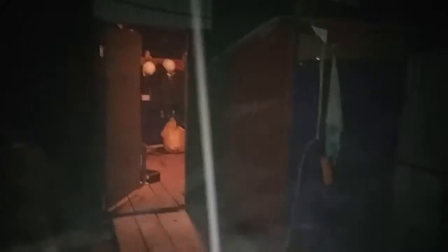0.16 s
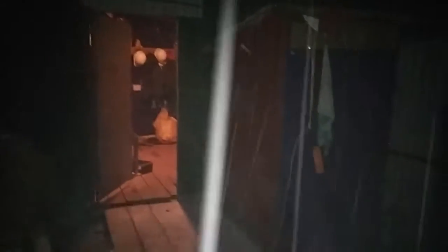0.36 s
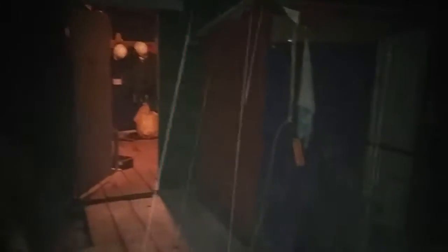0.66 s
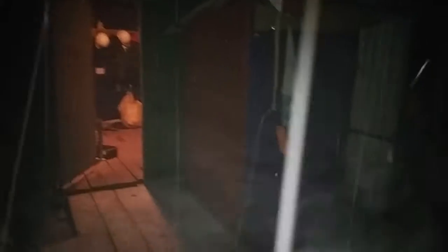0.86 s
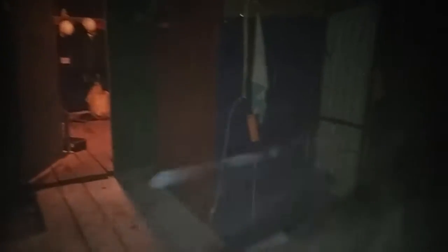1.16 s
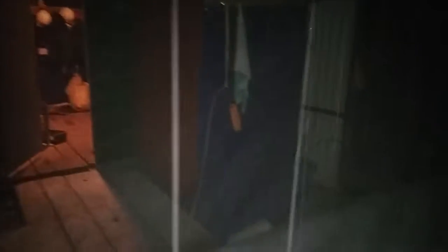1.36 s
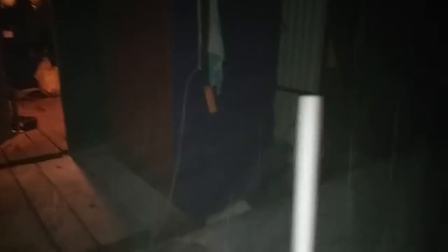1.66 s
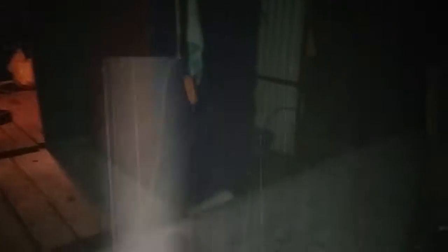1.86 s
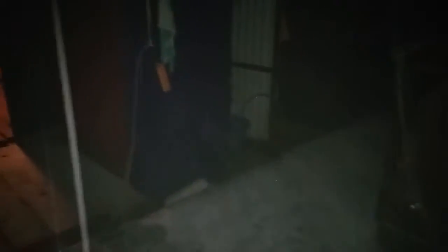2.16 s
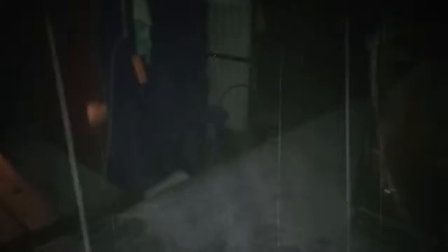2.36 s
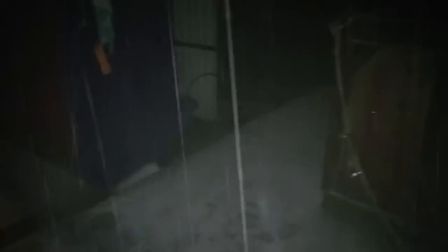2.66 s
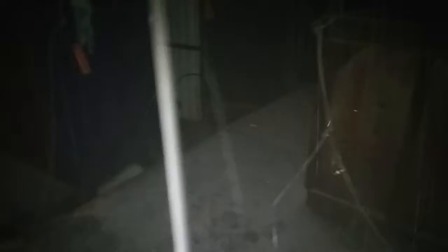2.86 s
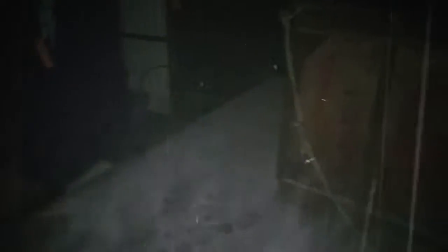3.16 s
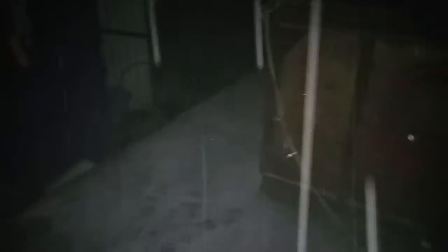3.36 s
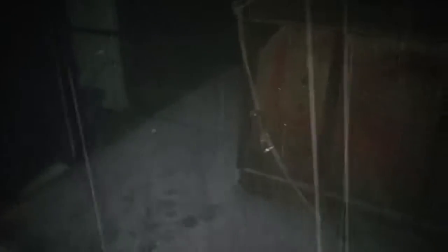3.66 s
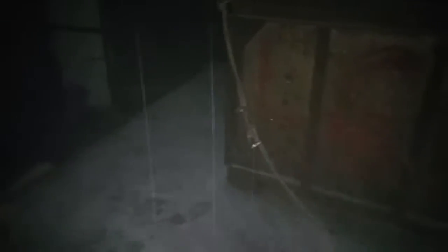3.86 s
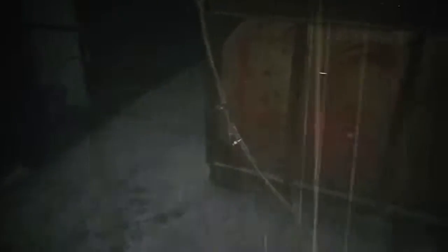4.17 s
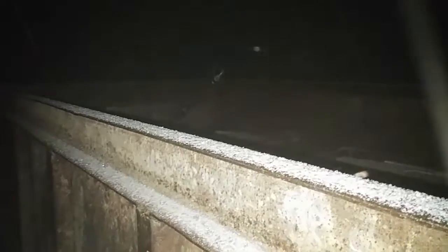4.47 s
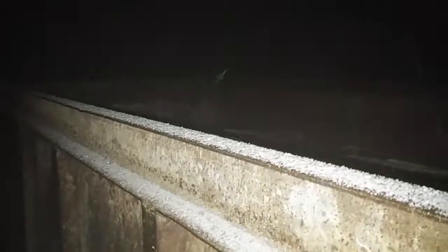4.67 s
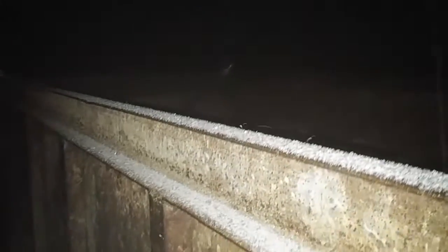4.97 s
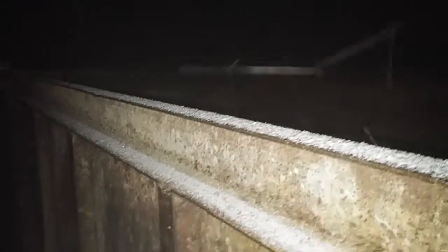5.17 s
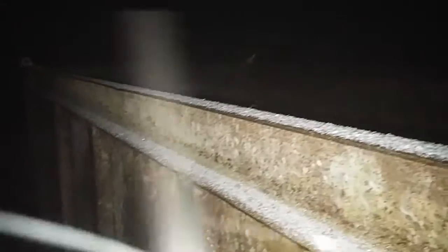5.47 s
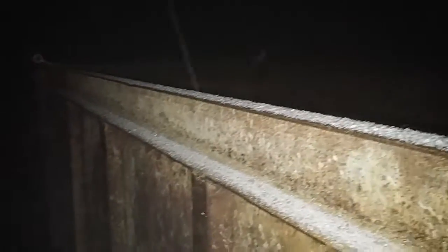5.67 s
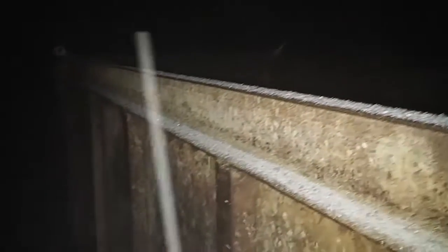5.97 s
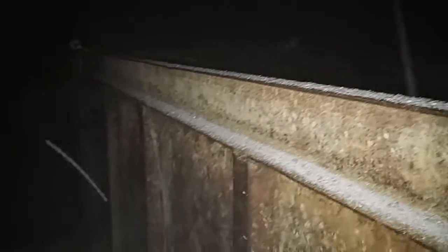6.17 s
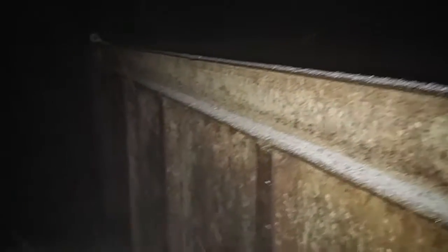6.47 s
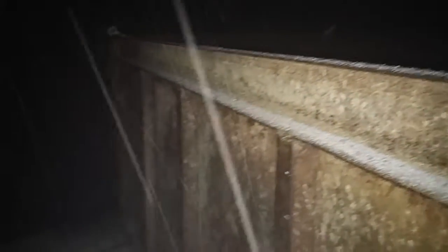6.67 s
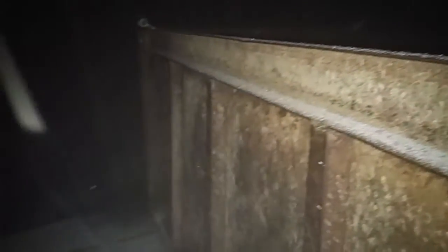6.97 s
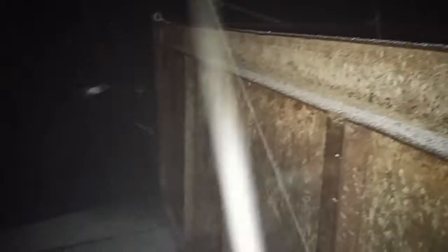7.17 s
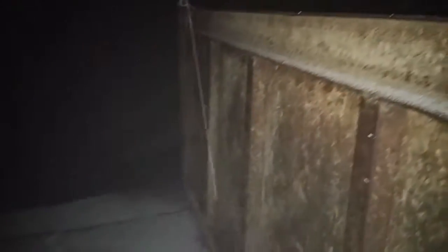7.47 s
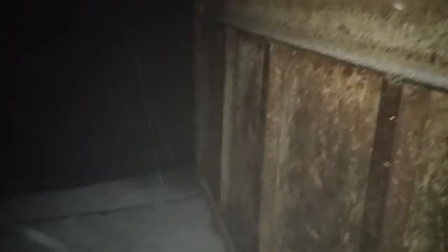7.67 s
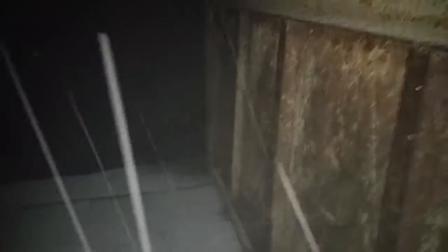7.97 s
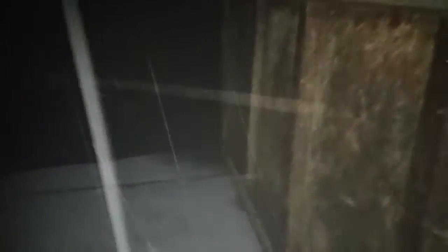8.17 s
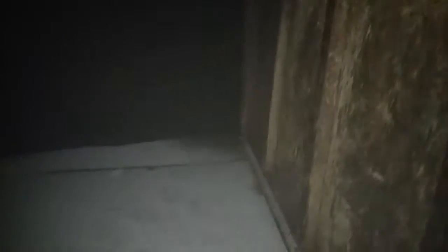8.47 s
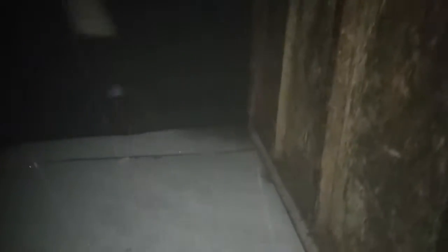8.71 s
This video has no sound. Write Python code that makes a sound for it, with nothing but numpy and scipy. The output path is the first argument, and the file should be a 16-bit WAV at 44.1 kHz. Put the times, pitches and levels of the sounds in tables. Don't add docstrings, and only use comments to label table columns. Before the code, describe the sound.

Sleet falls steadily outdoors at night. Countless distant pellets blend into a soft, grainy hiss, while nearer ones knock briefly on wooden walls, ledge, roof and deck. A hand-held stereo device picks up occasional hard, bright ticks on its own body, each letting the muffled treble open for a moment. Knocks crowd together around four seconds, then come in looser clusters to the end.

```python
import sys
import numpy as np
from scipy import signal
from scipy.fft import rfft, irfft
from scipy.io import wavfile

SR = 44100
rng = np.random.default_rng(int(sys.argv[2]) if len(sys.argv) > 2 else 0)


def output_pcm(signal):
    pcm = np.clip(np.atleast_2d(signal).T, -1, 1) * 32767
    wavfile.write(sys.argv[1], SR, np.round(pcm).astype(np.int16))


def volts_from_db(level):
    exponent = np.asarray(level, float) / 20
    return 10 ** exponent


N = 389844


def rms_one(x):
    return x / np.sqrt(np.mean(x ** 2) + 1e-20)


def in_time(rows):
    s, *columns = np.transpose(rows)
    return np.array([np.interp(np.arange(N) / SR, s, c) for c in columns])


def at_hz(hz_points, values, hz):
    return np.interp(np.log(np.maximum(hz, 1)), np.log(hz_points), values)


def band(x, low_hz, high_hz):
    return signal.sosfilt(signal.butter(2, [low_hz, high_hz], "band", fs=SR, output="sos"), x)


def low_pass(x, order, hz):
    return signal.sosfiltfilt(signal.butter(order, hz, fs=SR, output="sos"), x)


def drift(rate_hz):
    r = np.exp(-80 * np.pi * rate_hz / SR)
    slow = signal.lfilter([1], [1, -2 * r, r * r], rng.standard_normal(N // 40 + 2002))[2000:]
    return np.interp(np.arange(N) / 40, np.arange(len(slow)), rms_one(slow))


def ring(clicks, hz, t60):
    r, w = volts_from_db(-60 / (t60 * SR)), 2 * np.pi * hz / SR
    return signal.lfilter([0, np.sin(w)], [1, -2 * r * np.cos(w), r * r], clicks + 1e-18)


def burst(hz, t60, rise_s, delay_s, phase=0):
    t = np.maximum(np.arange(882) / SR - delay_s, 0)
    shape = (1 - np.exp(-t / abs(rise_s))) * volts_from_db(-60 * t / abs(t60))
    return shape / shape.max() * np.sin(2 * np.pi * hz * t + phase)


def add(out, s, wave):
    i = round(s * SR)
    out[i:i + len(wave)] += wave[:N - i]


def add_panned(out, s, wave, db, pan_db):
    add(out.T, s, np.outer(wave, volts_from_db(db + pan_db * np.array([.5, -.5]))))


def grains(per_s, spread_db, top):
    sizes = volts_from_db(spread_db * np.minimum(rng.exponential(1, N), top)) * rng.choice([-1, 1], N)
    return sizes * (rng.random(N) < per_s * volts_from_db(1.2 * drift(8)) / SR)


# (frequency [Hz], left [dB per Hz], right [dB per Hz])
HISS_COLOUR = [(34, -25, -31), (82, -10.5, -12), (202, -1, -2.5), (422, -3, -5.5), (1300, -2.5, -5.5),
               (1730, -0.5, -3), (2220, 2, 2), (6100, 0, 2.5), (6525, -5, 0.5), (8020, -27.5, -16.5),
               (9900, -22, -4.5), (11900, -20.5, -18), (14700, -23, -25), (15700, -20, -23)]
# (frequency [Hz], left-right likeness [-1 to 1])
PORT_LIKENESS = [(60, 0.96), (180, 0.9), (550, 0.7), (1650, -0.17), (4970, -0.052), (15000, 0.056)]


def patter(grain_db):
    hz = np.fft.rfftfreq(N, 1 / SR)
    mid, side = rfft(rng.standard_normal((2, N)))
    alike = np.clip(at_hz(*np.transpose(PORT_LIKENESS), hz), -1, 1)
    shared, opposed = np.sqrt(.5 + alike / 2) * mid, np.sqrt(.5 - alike / 2) * side
    blur = irfft(shared + opposed * [[1], [-1]], N)
    fine = rms_one(np.array([grains(2500, spread_db=0.5, top=4.7) for port in range(2)]))
    mixed = blur + volts_from_db(grain_db) * band(fine, 1050, 9000)
    points, *colours_db = np.transpose(HISS_COLOUR)
    colour = volts_from_db(np.array([at_hz(points, c, hz) for c in colours_db])) * (hz < 15980)
    return rms_one(irfft(rfft(mixed) * colour, N))


# (time [s], level [dB])
SKITTER_LEVEL = [
    (0, -61),
    (1, -81),
    (3.4, -62.5),
    (3.7, -49.5),
    (4.1, -55),
    (4.3, -62.5),
    (6, -56),
    (6.6, -57.5),
    (8.84, -78),
]


def skitter():
    contacts = np.array([grains(700, spread_db=3.5, top=3.8) for port in range(2)])
    dull = band(band(contacts, 1300, 3140), 1300, 3140)
    return volts_from_db(in_time(SKITTER_LEVEL)) * rms_one(dull)


def small_knocks(per_s, low_hz, high_hz, cycles):
    hits = grains(per_s, spread_db=4.0, top=3.2)
    dealt, out = rng.integers(0, 10, N), np.zeros((2, N))
    for k, hz in enumerate(np.geomspace(low_hz, high_hz, 10)):
        board = band(ring(hits * (dealt == k), hz, cycles / hz), 0.64 * hz, 2.0 * hz)
        lag, pan_db = rng.integers(-10, 10), rng.normal(0, 0.83)
        out += [volts_from_db(pan_db) * np.roll(board, lag), volts_from_db(-pan_db) * board]
    return out


# (time [s], patter level [dB])
FALL_LEVEL = [
    (0.0, -55),
    (3.5, -54.5),
    (8.44, -54.5),
    (8.84, -53),
]
# (time [s], gain below 200 Hz [dB])
RUMBLE_GAIN = [
    (0, -2),
    (3.6, -1),
    (4.3, 1.5),
    (7.2, 1),
    (8.84, 0),
]


def far_sleet():
    swell_db = .35 * drift(6)
    far = volts_from_db(in_time(FALL_LEVEL) + 6.5 + swell_db) * patter(grain_db=-4.0) + skitter()
    far += volts_from_db(-59) * small_knocks(150, 730, 2070, cycles=7.8)
    far += volts_from_db(-61.5) * small_knocks(260, 1900, 10700, cycles=5.4)
    return far + (volts_from_db(in_time(RUMBLE_GAIN)) - 1) * low_pass(far, 2, 200)


# (time [s], peak level [dB], left-right [dB], pitch [Hz], snap over the knock [dB])
WALL_HITS = [(0.145, -41, 2.5, 1300, -8), (.1452, -34, 2, 2900, -10), (0.3145, -26.5, 8, 2920, -22),
             (0.4358, -41.5, -16, 1910, 4), (0.9796, -31.5, 4.5, 1900, -11), (1.134, -33, 2, 2400, -21),
             (1.9162, -36, 5, 1940, -8), (1.923, -37.5, -1, 2640, 6), (2.0586, -34.5, -1, 3060, -5),
             (2.321, -39, -6, 2200, 6), (2.334, -36, 4.5, 1630, -10), (2.3415, -35, -3, 2220, -3),
             (2.348, -35.5, -10, 2720, 4.5), (2.62, -41, 14.5, 2700, 4), (2.665, -32.5, 1, 2300, -9),
             (2.8677, -29, 5.5, 2120, -5), (3.1243, -33.5, 4, 1940, -6), (3.417, -37, -3, 3800, 1),
             (3.5373, -39.5, 8, 1590, 4), (3.921, -40, 0, 1000, 16), (4.0464, -41.5, 2, 1090, 3),
             (5.122, -31.5, -5, 3160, -2), (6.049, -41, 0, 1850, 8), (7.7788, -38, 6, 1800, -11),
             (8.1995, -28, -2, 3180, -21)]
LEDGE_HITS = [(1.2464, -40.5, 2, 1500, 2), (1.4317, -36, -1, 2300, 2), (1.4682, -39, 3, 1880, -6),
              (1.968, -34.5, -1, 2290, -3), (2.6046, -36.5, 2, 1920, -13), (2.821, -32.5, 2, 2110, 2.5),
              (2.915, -35.5, -1, 2390, 4), (2.9851, -38, 1, 1820, 5), (3.28, -36, 3, 1400, 0.5),
              (3.408, -36, -6, 3700, -2), (3.5234, -34, -5, 2700, 2), (3.6338, -37.5, 0, 1360, -12),
              (3.6838, -29, 19, 3430, -10), (4.673, -38.5, -3, 2400, 6.5), (5.095, -33.5, 1, 1840, 2),
              (5.4325, -36.5, -1, 1840, -1), (6.0796, -28.5, 10.5, 4740, -3), (6.1213, -34, 1, 2400, -2),
              (6.3846, -32.5, 3, 2330, 0), (7.831, -37.5, 2, 2140, -6), (7.8913, -33, 1, 1890, 3.5),
              (7.9939, -32, 1, 2220, -3), (8.001, -39.5, 4, 1570, -2), (8.765, -36, -1, 2390, 7)]
ROOF_HITS = [(.403, -36, 1, 2570, 5), (0.7549, -30, -0.5, 1640, 3), (0.9984, -38, 2, 1120, -4),
             (1.0532, -36, 1, 1740, 3), (1.36, -40, -10, 1960, -3), (1.4995, -34, 0, 1800, 5),
             (1.637, -34, 0, 1900, 2), (1.7465, -36, 3, 3000, 0), (1.8837, -28.5, 1, 1680, 3.5),
             (1.949, -34.5, 0, 1820, 2), (2.076, -34, 0, 1810, -3), (2.118, -39, -3, 2000, 7),
             (2.4164, -40.5, 2, 1480, -6), (3.7133, -27, -1, 1750, 0), (3.8075, -34, -1, 2030, 3),
             (3.9576, -37, 0, 1670, 10), (4.1055, -29.5, -1, 2130, 0), (5.7543, -36, 1, 2300, 4),
             (5.994, -37.5, 0, 1440, 0), (6.2352, -33, 2, 1820, 2.5), (7.053, -35, 3, 1850, -15),
             (7.8815, -32.5, 4, 1620, -7), (8.428, -41, 2, 1100, -2), (8.6266, -35.5, 2, 1730, -14)]
DECK_HITS = [(.004, -43, 24.5, 2600, -4), (0.1773, -34, 2, 1630, -10), (0.5767, -36.5, 1, 1210, -2),
             (0.6786, -40, 0, 2240, -2), (.6967, -38, 0, 1820, 4), (.835, -43, 1, 1300, 4),
             (0.956, -24, 3, 4960, 3), (0.956, -31, -1, 3800, -4), (1.065, -43, 2, 1100, 8),
             (1.0742, -40, -15, 2800, 6), (1.1624, -37, 2, 1850, -11), (1.349, -38, 24, 1730, 0),
             (1.533, -37.5, -2, 2480, 10), (1.69, -37.5, 0, 1960, -8), (2.5782, -38, 1, 2020, 6),
             (3.465, -35, 7, 3400, 3), (3.8147, -37, 0, 1300, -5), (4.2492, -36, 2, 1500, 1),
             (4.9263, -39.5, 1.5, 1410, 3), (5.1916, -38, 1, 2150, -3), (5.455, -36, 3, 1880, 4.5),
             (7.106, -34, 6.5, 2850, 0), (7.4734, -36, -1, 2060, -14), (7.556, -33.5, 1, 2500, -1)]
SURFACE_LAG_MS = [-0.24, -0.13, 0.059, 0.16]
FAINT_HITS = [0.308, .467, 1.231, 1.411, 1.516, 1.656, 1.899, 2.046, 2.263, 2.552, 2.672, 3.885, 3.97,
              4.241, 4.698, 5.661, 5.703, 5.976, 6.018, 6.063, 6.144, 6.734, 7.22, 7.232, 7.31, 7.862,
              7.942, 8.373, 8.663, 8.745]


def knocks():
    surfaces = [WALL_HITS, LEDGE_HITS, ROOF_HITS, DECK_HITS]
    rows = [(*row, lag) for table, lag in zip(surfaces, SURFACE_LAG_MS) for row in table]
    # -42 dB, centred, 1800 Hz, snap 4 dB
    rows += [(s, -42, 0, 1800, 4, SURFACE_LAG_MS[k % 4]) for k, s in enumerate(FAINT_HITS)]
    out, luck = np.zeros((2, N)), rng.random((len(rows), 4))
    shards = band(rng.standard_normal((len(rows), 2, 882)), 2640, 6480) * 3.87
    for (s, db, pan_db, hz, snap_db, lag_ms), chance, shard in zip(rows, luck, shards):
        for side, sign in enumerate((1, -1)):
            late = 0.00047 + sign * lag_ms / 2000
            over_hz, under_hz = hz * (1.354 + .5 * chance[side]), hz * (.5 + 0.5 * chance[3])
            note = -burst(hz, 6.0 / hz, .0004, late)
            note += volts_from_db(-11) * burst(over_hz, 0.0024, 0.00034, late, 6 * chance[2])
            note -= volts_from_db(-11.0) * burst(under_hz, 0.011, 0.000089, late)
            snap = shard[side] * burst(0, .006, .0002, late, np.pi / 2)
            knock = volts_from_db(6.5) * note + volts_from_db(snap_db - 6.0) * snap
            add(out[side], s, volts_from_db(db + sign * pan_db / 2) * knock)
    return -band(out, 380, 7000)


def crackle():
    clicks = band(grains(45, spread_db=3.5, top=3), 800, 4200)
    return volts_from_db(-33) * np.array([np.roll(clicks, 5), clicks])


# (time [s], peak level [dB], pitch [Hz])
LIGHT_PIPS = [(.4135, -39, 1340), (.7872, -40, 1180), (.9897, -41, 1360), (1.2789, -42, 1520),
              (1.7173, -41, 1040), (1.8701, -37, 1530), (2.138, -40, 1440), (2.1898, -41, 1550),
              (2.291, -43, 1235), (2.3255, -35.5, 1190), (3.2874, -39, 1270), (3.7331, -41, 1040),
              (4.1812, -43, 1240), (4.45, -43.5, 1290), (4.5035, -41, 1170), (4.5555, -40.5, 1400),
              (5.278, -41, 1450), (5.4503, -34, 1050), (5.502, -41, 1630), (5.675, -42.5, 1250),
              (6.537, -38.5, 1290), (6.6816, -41.5, 1400), (6.9306, -41.5, 1360),
              (7.2754, -39.5, 1600), (7.6265, -38, 1300), (8.235, -38.5, 1670),
              (.0266, -37, 3330), (0.861, -33, 3660), (1.2914, -39.5, 2940), (3.0715, -35, 2220),
                   (3.788, -32.5, 4100), (4.374, -32.5, 5700), (4.4684, -39.5, 2130), (4.5566, -40, 3300),
                   (5.5327, -39, 5810), (6.344, -42, 3450), (6.643, -43, 2250), (6.735, -39, 5430),
                   (7.6948, -28, 4850), (7.72, -37, 5230), (8.006, -33, 2400), (8.742, -36.5, 5500)]


def pips():
    out = np.zeros((2, N))
    for s, db, hz in LIGHT_PIPS:
        pip = burst(hz, .005 + 3.5 / hz, .0004, .0002)
        pip += volts_from_db(-6) * burst(1.23 * hz, .005, .0003, .0002)
        add_panned(out, s, pip, db, pan_db=5.5 - 7 * np.log2(hz / 1000))
    return -band(out, 380, 7000)


# (time [s], peak
# level [dB], left-right [dB], pitch [Hz])
SINGLE_NOTES = [(0.5296, -39, 3.0, 1210.0), (0.6907, -45, 3.0, 775), (0.8354, -32.5, 1.0, 890),
                (0.8608, -44, 6.0, 660.0), (0.8703, -43, 5.0, 770.0), (1.1337, -44, 4, 880.0),
                (1.4176, -42.0, 5, 880.0), (1.6555, -33, 1.0, 990.0), (1.8571, -40.0, -1.0, 1100.0),
                (2.1983, -42.0, 6.0, 1100.0), (2.3889, -41.0, 7, 880.0), (2.4058, -45, 3.0, 880.0),
                (2.5036, -40.0, 3.0, 990.0), (3.2923, -44, 14.0, 1210.0), (3.5113, -42, 1.0, 880.0),
                (3.5657, -43.0, 5.0, 880.0), (3.7074, -40.0, -2.0, 1100.0), (3.7872, -44, 8.0, 880.0),
                (3.7962, -40, 1.0, 990.0), (3.8845, -43, 0.0, 1320.0), (4.098, -37, 3.0, 1320.0),
                (4.1169, -43.0, 2.0, 660.0), (4.2037, -40, 1.0, 990.0), (5.2983, -44, 3.0, 770.0),
                (5.5851, -40, 5.0, 1100.0), (5.9837, -41.5, 3.0, 1320.0), (6.0191, -44, 1.0, 550.0),
                (6.1927, -44, 9, 880.0), (6.4237, -42, 7.0, 1100.0), (6.6422, -41.0, 3.5, 1430.0),
                (7.0019, -42, 1.0, 770.0), (7.6339, -38, 1.0, 1100.0), (7.7083, -42.0, 3.0, 1430.0),
                (7.7203, -40, 3.0, 660.0), (7.7467, -44.0, 4.0, 770.0), (7.7522, -40, -9.0, 1320.0),
                (8.3099, -41.5, 5.0, 1100.0), (8.4172, -44.5, 4, 770.0), (8.4516, -41, 4.0, 990.0),
                (8.7659, -38, 3.0, 1100.0), (8.7968, -43, 4.5, 1320.0), (8.8372, -38, 1.0, 1210.0),
                (0.0267, -36, 7.0, 2200.0), (0.4139, -42, 3.0, 3200.0), (0.4672, -38, 3.0, 3200.0),
               (0.8352, -37, -1.0, 2760.0), (0.9561, -29, -2, 1540.0), (0.9985, -36.0, 5.0, 2980.0),
               (1.0539, -35.0, 3.0, 3310.0), (1.3487, -26, 1.0, 3090.0), (1.9224, -37, 3.0, 2210),
               (1.95, -36.0, -9.0, 3070), (1.9723, -36, -2.0, 1650.0), (2.2911, -36, -2.0, 2090.0),
               (2.6717, -33, -4.0, 3310.0), (2.8207, -34, -7, 3200.0), (2.9975, -38, -4.0, 3310.0),
               (3.2878, -33, -3, 2090.0), (3.425, -40, 0.0, 1980.0), (3.634, -38, -11.0, 2980.0),
               (3.714, -25.5, -2.0, 3090.0), (3.7957, -39, -2.0, 2320.0), (3.8138, -41, 5.0, 1870.0),
               (3.9242, -33, 6.0, 1870.0), (3.924, -35, -10.0, 3090.0), (3.9578, -37, 2.0, 2760.0),
               (3.9693, -36.0, -7.0, 2650.0), (4.0416, -34.0, 3, 1540.0), (4.18, -36.0, 6.0, 2090.0),
               (4.6727, -44, -1, 1870.0), (4.7061, -38.0, 3.0, 1870.0), (4.8216, -42, 2, 1870.0),
               (4.8304, -42, 8, 1870.0), (5.4494, -31, 1.0, 2320.0), (5.45, -33, 7.0, 3200.0),
               (5.9754, -39, -5.0, 1760.0), (6.062, -33, -1.0, 2320.0), (6.236, -34, -2.0, 3200.0),
               (7.1075, -31, -1.0, 2200.0), (7.2327, -36.0, -5, 2540.0), (7.417, -40, -5, 2320.0),
               (7.863, -36.0, 0.0, 1980.0), (7.882, -35.0, 9, 3310.0), (8.0061, -27, -9.0, 2870.0),
               (8.6642, -39, -3, 2950), (8.7414, -42, 5.0, 1870.0), (8.8372, -36, -3.0, 1980.0),
                (0.1774, -38, -8.0, 6280.0), (0.6413, -35.0, -9.0, 6060.0), (0.8349, -33, -3.0, 5730.0),
               (1.0537, -36.0, -8.0, 5400.0), (1.5328, -31.0, -14.0, 6390.0), (1.5333, -32, -9.0, 4300.0),
               (1.7169, -34, -5.0, 4410.0), (1.9489, -32, -2.0, 4410.0), (2.325, -37.0, 15.0, 5290.0),
               (2.8673, -28, -7.0, 3640.0), (2.9975, -29, -3.0, 4850.0), (3.9199, -37, -15.0, 6390.0),
               (3.958, -34, 2, 4850.0), (4.0476, -38, -11.0, 3400), (5.4325, -37, -1.5, 4850.0),
               (5.451, -35, 3.0, 4740.0), (5.976, -35, -10, 5840.0), (6.062, -35, -7.0, 5290.0),
               (6.08, -37, -12, 6700), (6.1099, -33, -9.0, 5840.0), (6.735, -37.0, -10.0, 4410.0),
               (6.934, -32, -9.5, 5510.0), (7.0466, -37.0, -11.0, 5070.0), (7.7527, -36.0, -15.0, 6650),
               (7.8909, -37.0, -2.0, 5760), (7.8954, -39, 4.0, 4630.0), (8.7659, -33.0, -9.0, 5180.0)]


def notes():
    out = np.zeros((2, N))
    for s, db, pan_db, hz in SINGLE_NOTES:
        note = burst(hz, 0.003 + 3.9 / hz, 0.00027, .0002)
        add_panned(out, s, note, db - 2, pan_db)
    return band(out, 380, 7500)


def upper_mode():
    return burst(13700, 0.00036, .00015, 0.000216)


# (time [s], left level [dB], right level [dB])
DEVICE_TICKS = [(0.1783, -44.8, -29), (.4363, -40, -28.5), (0.643, -48, -34), (.835, -34.5, -37),
                (0.956, -50, -27), (.9988, -36, -34), (1.0652, -35.5, -44), (1.0744, -43, -27),
                (1.3491, -45, -35), (1.3633, -46.2, -15.5), (1.4553, -47.6, -23.5), (1.5165, -50, -36),
                (1.5339, -40, -19), (1.884, -36, -33), (1.8988, -43, -35), (2.045, -46.5, -37),
                (4.235, -36.5, -41), (2.3211, -45, -28), (2.3258, -50, -32), (2.3413, -47, -29.5),
                (2.4714, -49, -39), (2.6194, -18, -49), (3.464, -18, -41), (3.537, -11, -35.5),
                (3.684, -18, -48), (3.6957, -32, -37.5), (3.714, -48, -38), (3.957, -27, -45),
                (4.0474, -50, -40), (6.0795, -35.5, -12), (6.11, -44, -38), (7.753, -50, -19),
                (7.8955, -25, -41)]
# (resonance [Hz], width [Hz])
PORT_CAVITIES = [
    (14900, 9800),
    (9850, 2000),
]


def ticks():
    out, luck = np.zeros((2, N)), rng.standard_normal((len(DEVICE_TICKS), 2, 882))
    crack_db, upper_db = [-7, -3], [-32, -10.0]
    for (s, *levels_db), crunch in zip(DEVICE_TICKS, luck):
        for side, (hz, width_hz) in enumerate(PORT_CAVITIES):
            cavity = burst(hz, 4.1 / width_hz, 0.00012, 0.000237)
            cavity += volts_from_db(upper_db[side]) * upper_mode()
            crack = crunch[side] * burst(0, 0.00075, 0.00025, .0001, np.pi / 2)
            crack = np.diff(crack, prepend=0)
            tick = volts_from_db(7.5) * cavity + volts_from_db(crack_db[side]) * crack
            add(out[side], s, volts_from_db(levels_db[side]) * tick)
    return out


# (time [s], left treble gain [dB], right treble gain [dB])
SUPPRESSOR_SETTLING = [
    (0, 15.5, 16),
    (.45, 16, 14),
    (.9, 11.5, 7.5),
    (2.2, 11, 6.5),
    (3.5, 10.5, 3),
]


def suppressor_db():
    from_db, slope, ceiling_db = [-42.5, -49], [2.5, 0.93], [18.5, 15.5]
    lift, t = in_time(SUPPRESSOR_SETTLING), np.arange(SR // 2) / SR
    fade = (1 - np.exp(-t / .006)) * np.exp(-(t / 0.24) ** 1.18)
    for s, *levels_db in DEVICE_TICKS:
        up_db = np.maximum(slope * np.subtract(levels_db, from_db), 0)
        wish = np.outer(np.minimum(up_db, np.add(ceiling_db, 5.0)), fade)
        wish = np.minimum(wish, np.c_[ceiling_db])
        i = round(s * SR)
        lift[:, i:i + len(t)] = np.maximum(lift[:, i:i + len(t)], wish[:, :N - i])
    return lift


def suppressed(far):
    low, upto_port = low_pass(far, 6, 7680), low_pass(far, 6, 12200)
    lift_db = suppressor_db()
    top_share = [[.95], [.6]]
    return low + volts_from_db(lift_db) * (upto_port - low) + volts_from_db(top_share * lift_db) * (far - upto_port)


# (time [s], port [0 left, 1 right], thud level [dB], snap level [dB])
BODY_JOLTS = [
    (3.538, 0, -41, -26),
    (3.6829, 0, -35.5, -24),
    (7.7529, 1, -36, -11),
]


def jolts():
    out = np.zeros((2, N))
    thud = band(burst(270, 0.012, 0.00045, 0.00017), 70, 900)
    for s, side, db, snap_db in BODY_JOLTS:
        add(out[round(side)], s, volts_from_db(db) * thud + volts_from_db(snap_db) * upper_mode())
    return out


# (time [s], level [dB])
BREEZE_LEVEL = [
    (0, -85),
    (4.6, -85),
    (5.3, -80),
    (6, -81),
    (7, -79),
    (7.55, -76),
    (7.7, -71),
    (8.15, -66.5),
    (8.3, -82),
    (8.84, -80),
]


def breeze():
    lumps = band(rng.standard_normal((2, N)), 54, 86) * volts_from_db(2.5 * drift(9.1))
    return volts_from_db(in_time(BREEZE_LEVEL) - [[0], [9]]) * rms_one(lumps)


def scene():
    near = knocks() + crackle() + pips() + notes()
    device = ticks() + jolts()
    return suppressed(far_sleet()) + near + device + breeze()


def held_back(x, hz, width_hz):
    r, w = np.exp(-np.pi * width_hz / SR), 2 * np.pi * hz / SR
    poles = [1, -2 * r * np.cos(w), r * r]
    return signal.lfilter(poles[::-1], poles, x)


def band_limit(x):
    return signal.sosfilt(signal.butter(12, 16970, fs=SR, output="sos"), x)


# (frequency [Hz], width [Hz])
FILTER_SEAM = [
    (4000, 1000),
    (4000, 350),
    (4000, 130),
]


def record(dry):
    for hz, width_hz in FILTER_SEAM:
        dry = held_back(dry, hz, width_hz)
    cut = signal.sosfilt(signal.cheby2(12, 70, 17100, fs=SR, output="sos"), dry)
    mix = cut - .0004
    return band_limit(mix)


dry = scene()
out = record(dry)
output_pcm(out)
```